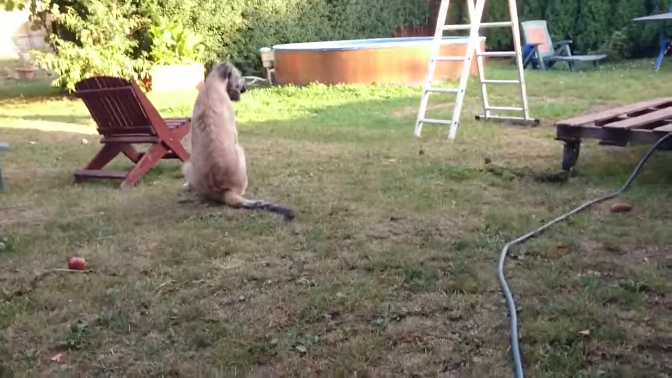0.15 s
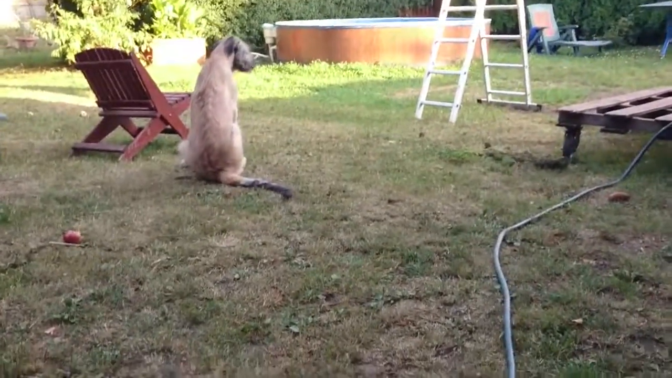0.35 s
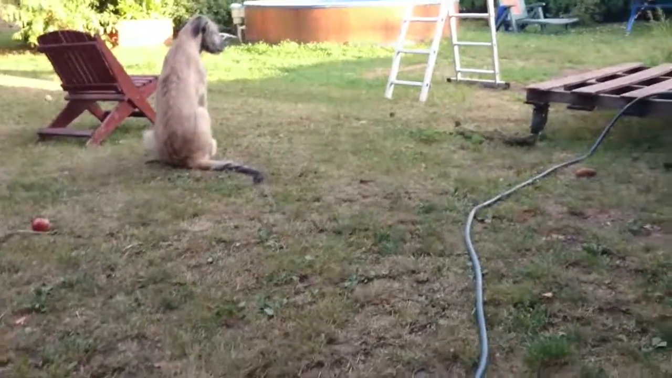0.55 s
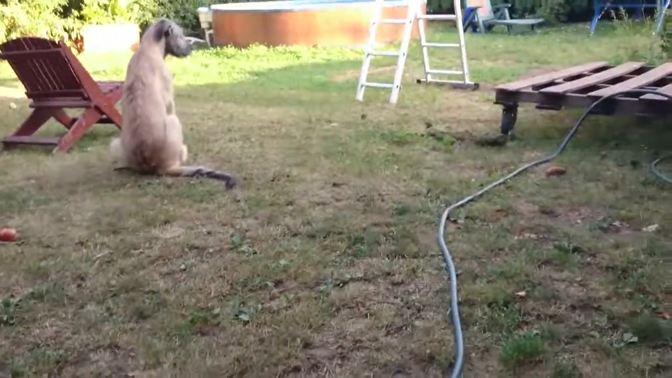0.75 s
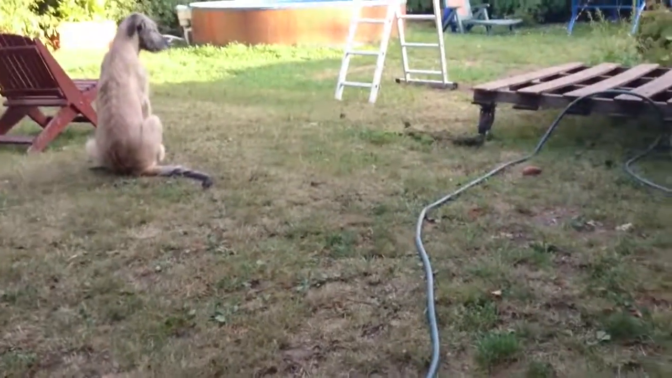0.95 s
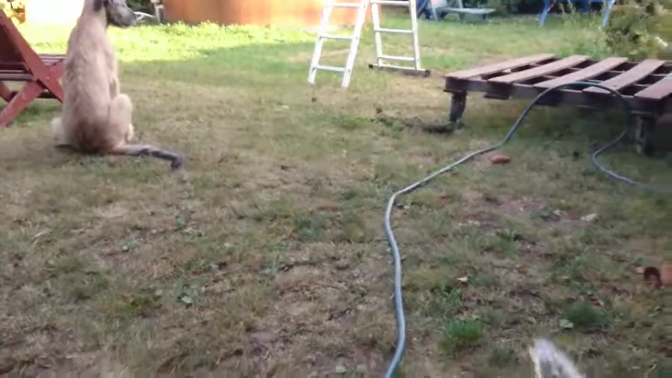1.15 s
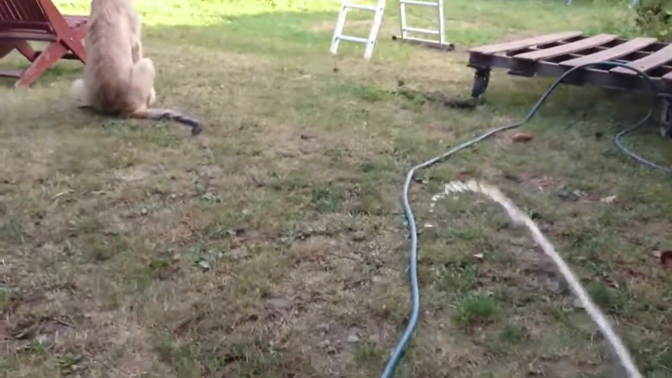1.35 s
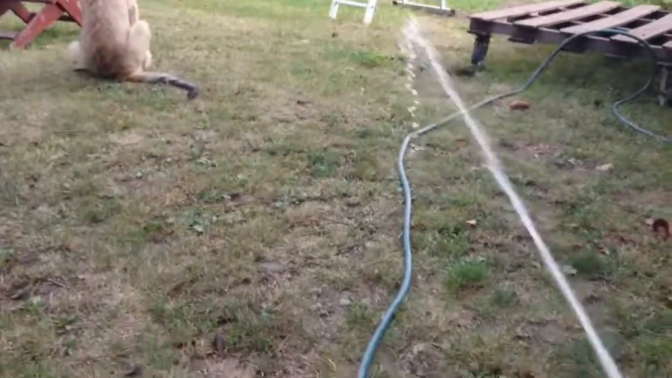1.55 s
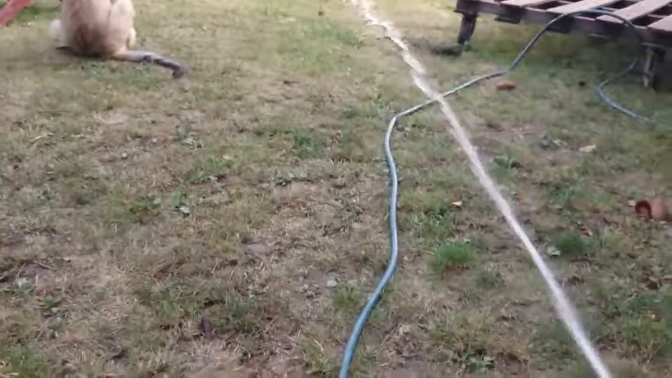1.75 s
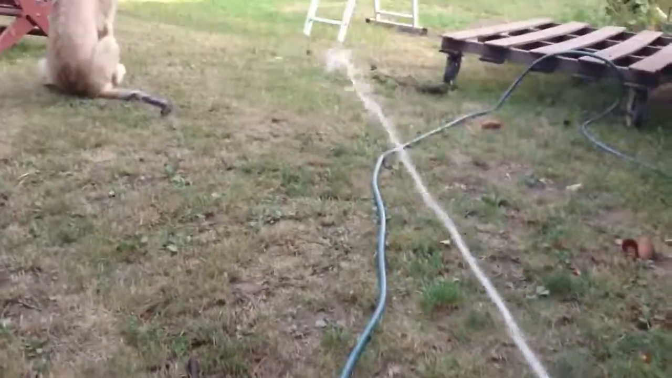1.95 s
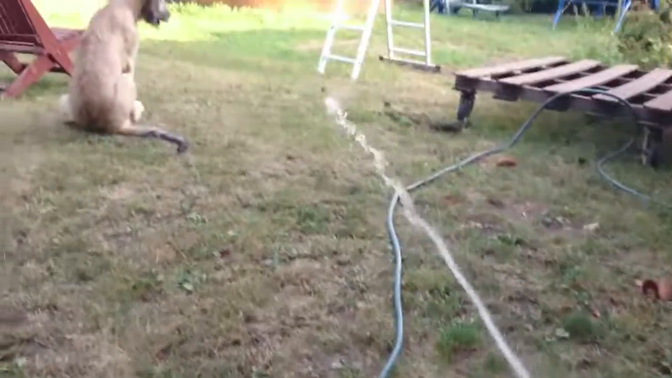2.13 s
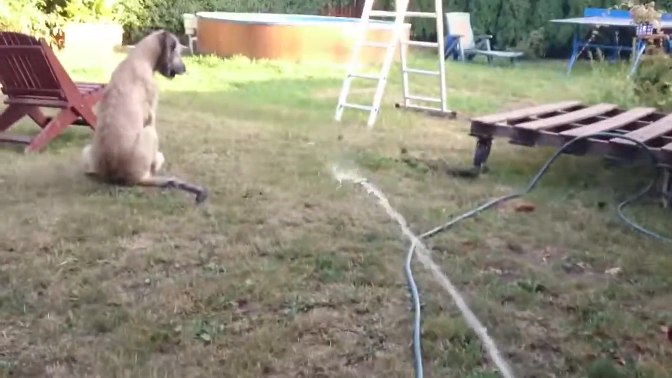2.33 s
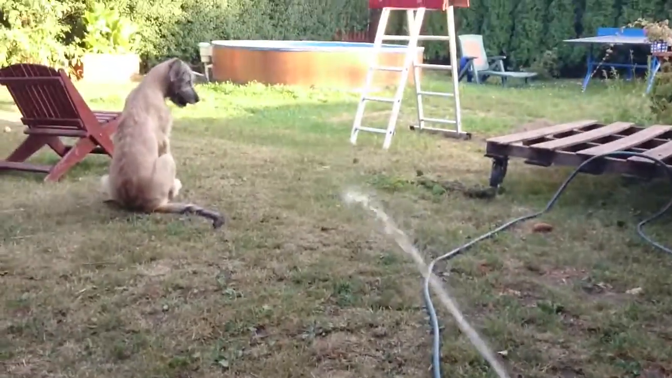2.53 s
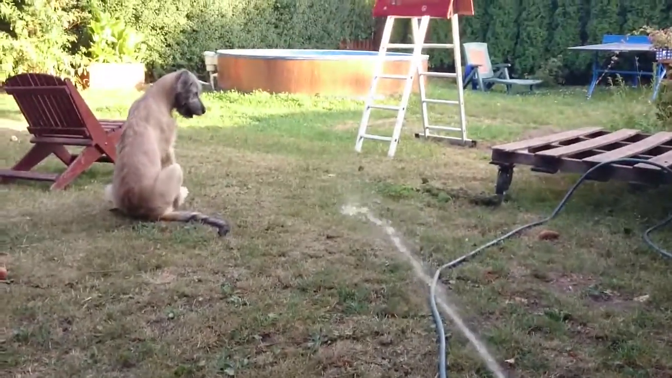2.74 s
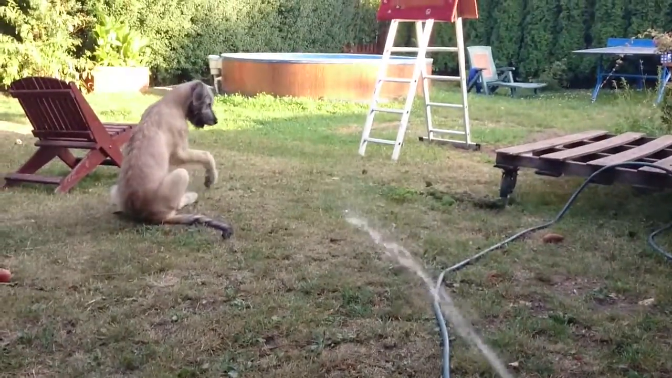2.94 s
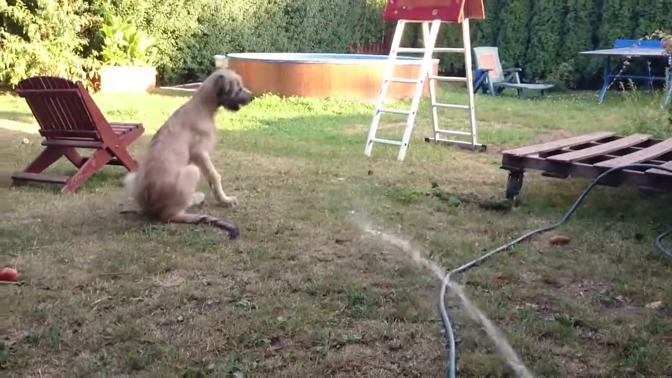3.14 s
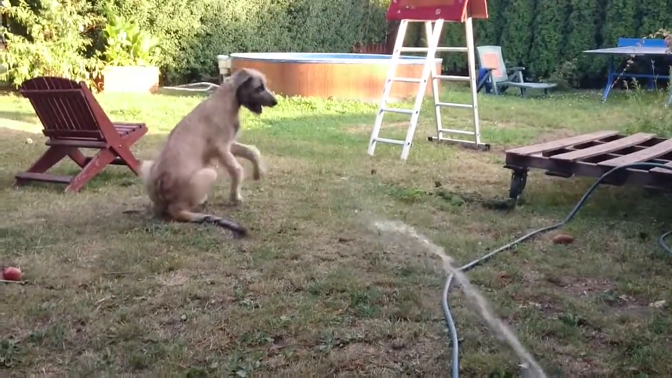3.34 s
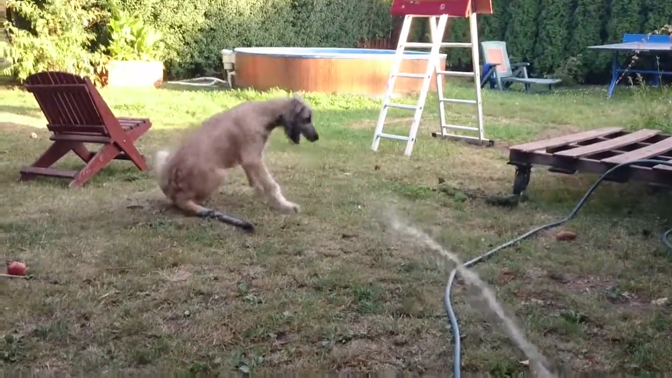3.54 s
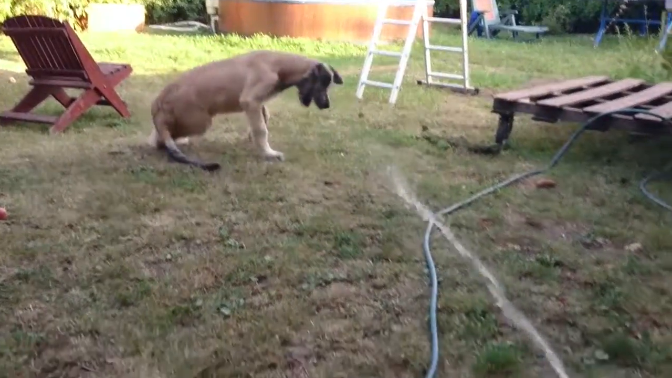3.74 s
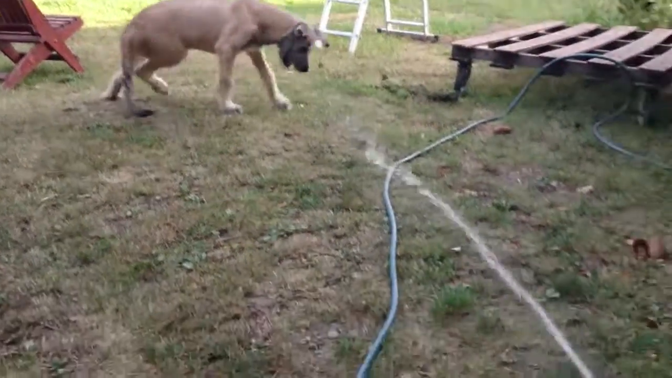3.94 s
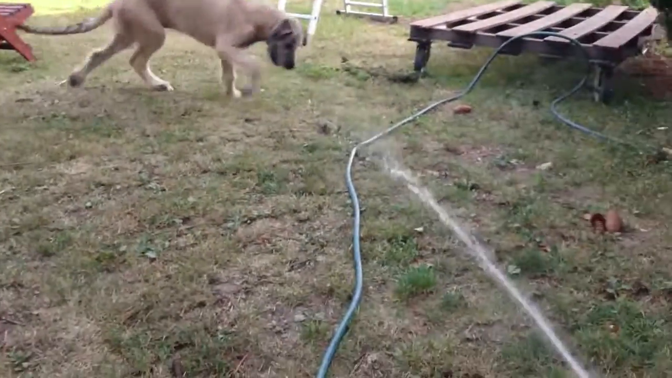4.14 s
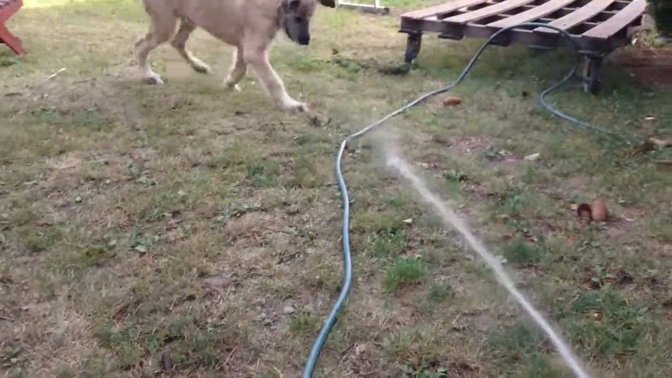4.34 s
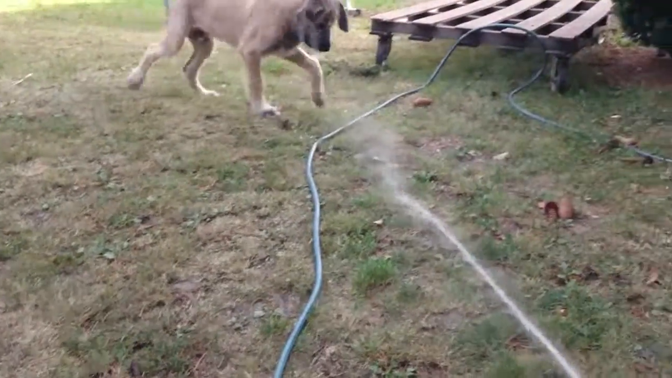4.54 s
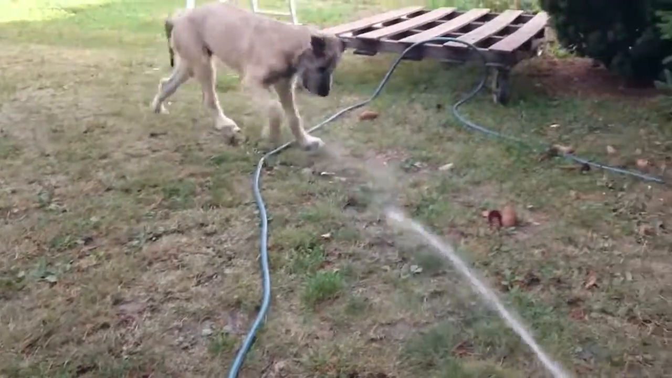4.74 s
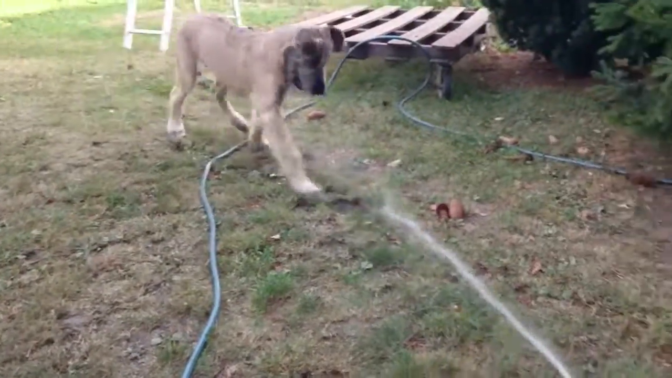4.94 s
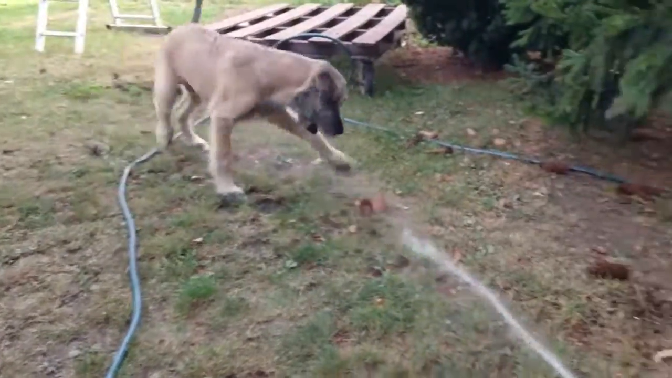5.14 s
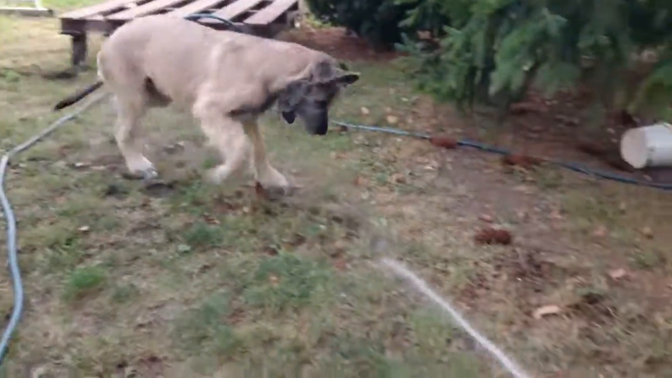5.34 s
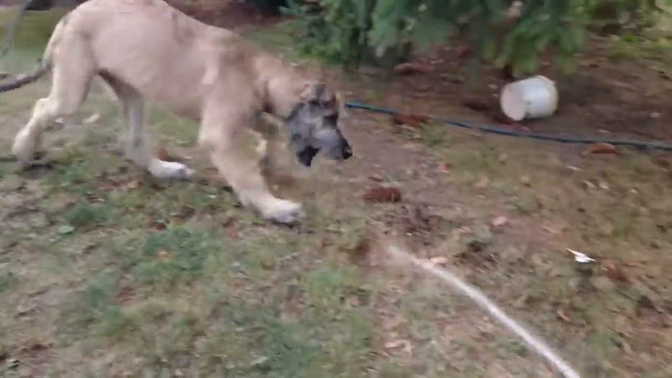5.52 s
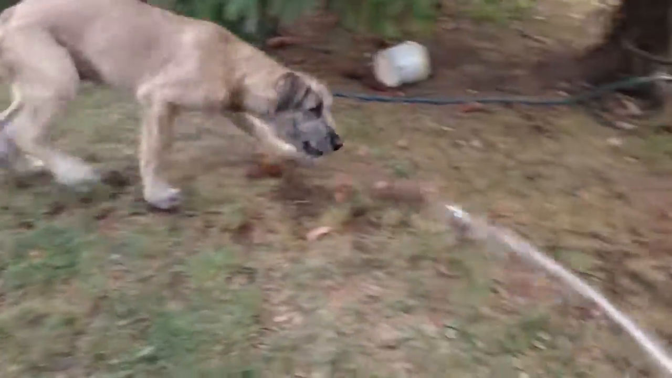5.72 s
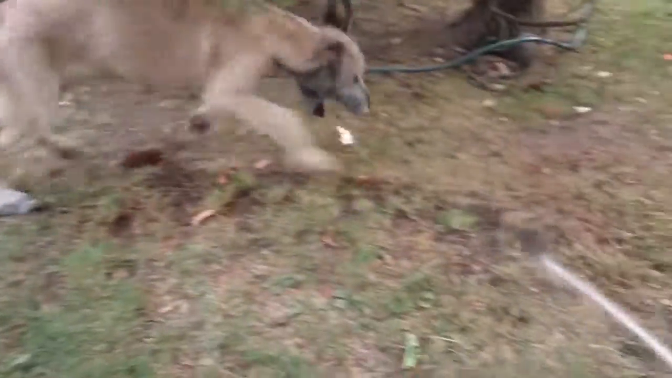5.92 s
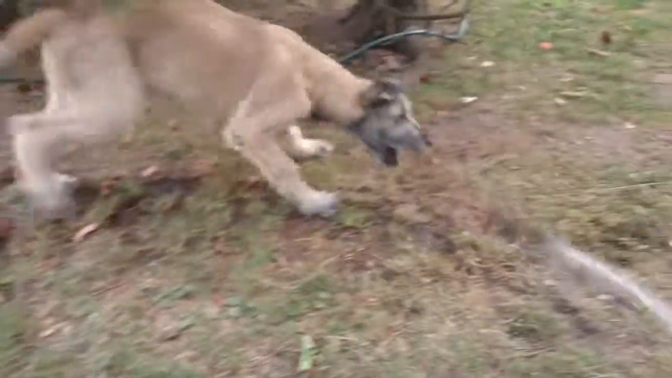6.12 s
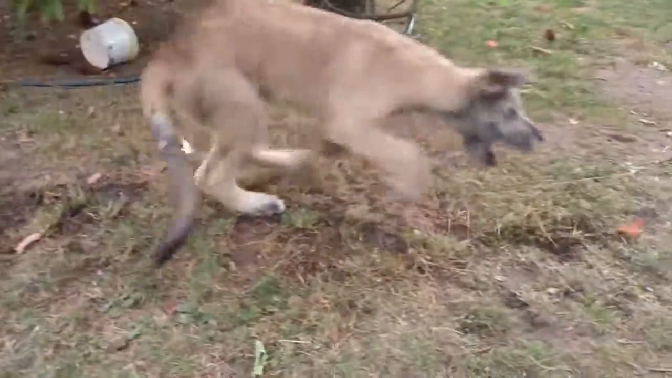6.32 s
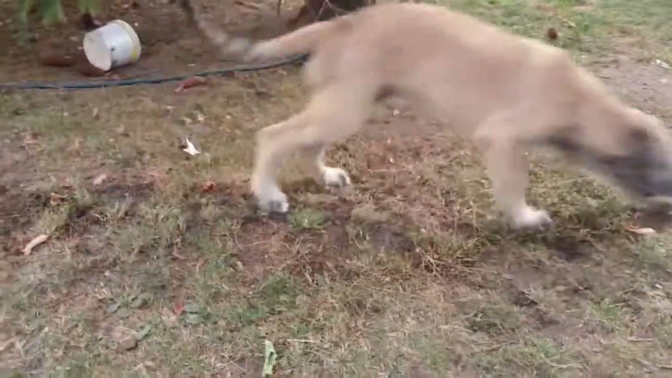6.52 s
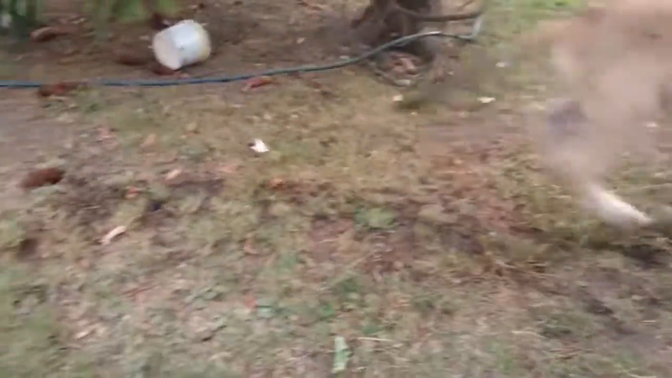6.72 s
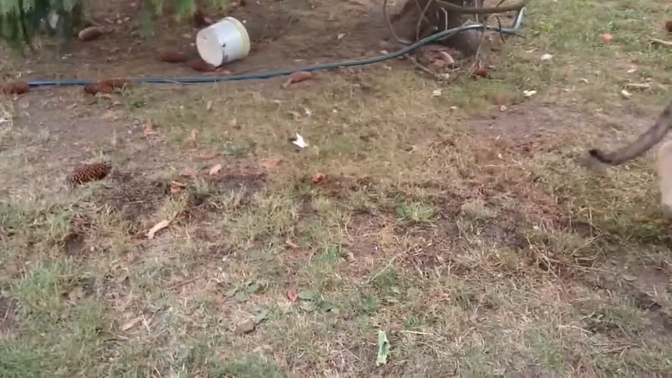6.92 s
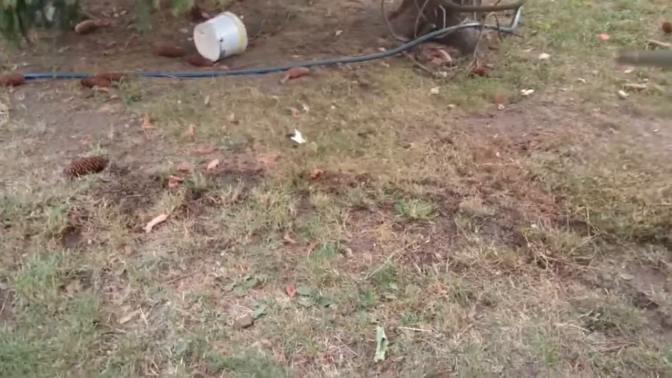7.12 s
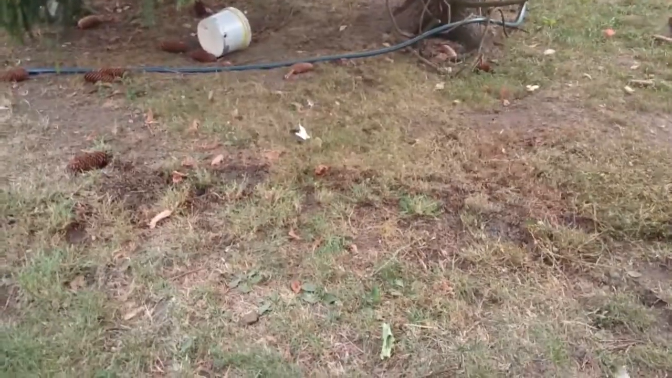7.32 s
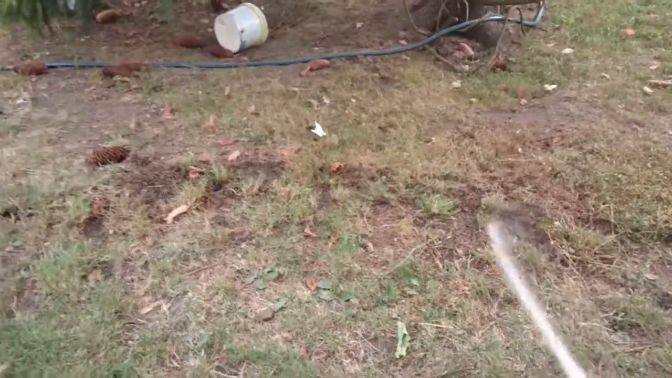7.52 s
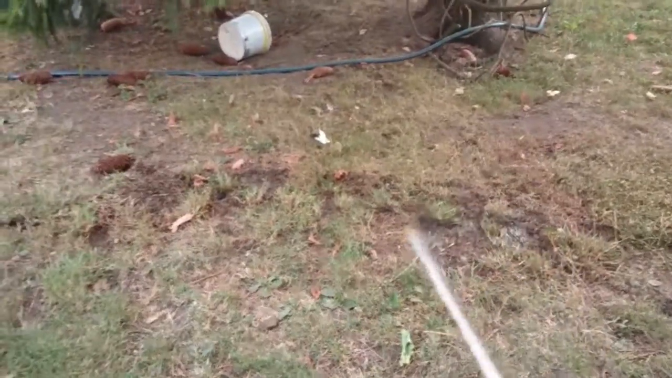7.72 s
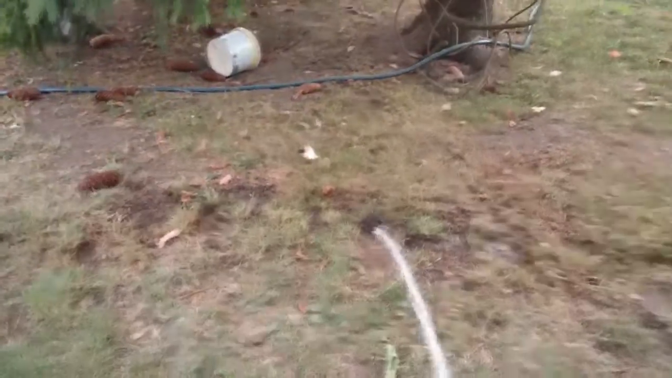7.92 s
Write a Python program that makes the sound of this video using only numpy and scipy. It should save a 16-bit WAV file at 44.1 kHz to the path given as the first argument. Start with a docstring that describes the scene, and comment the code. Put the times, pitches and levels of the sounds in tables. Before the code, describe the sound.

Quiet garden air, then a hose jet hisses hard onto dry grass, fizzing and spattering, stops abruptly, and bursts back closer and sharper.

```python
"""Faint hum, thin buzz and garden air come first, with light rustles; then a hose jet strikes a dry lawn.
Thousands of droplets a second hiss on the grass and patter on the soil, froth fizzes, and lumps of water slap.
A dog walks through the wet patch; the hose stops for a second, leaving the soaked ground, and starts again, nearer.
Clicks, filtered noise and ringing bubbles make the water, heard by a pair of ringing ports with widened bass."""
import sys
import numpy as np
from scipy import signal
from scipy.fft import rfft, irfft
from scipy.io import wavfile
from scipy.ndimage import uniform_filter1d

SR = 44100
rng = np.random.default_rng(int(sys.argv[2]) if len(sys.argv) > 2 else 0)


def wrap_up_sound(samples):
    """Save the sound to the file named by the first command line argument, as 16-bit audio."""
    columns = np.atleast_2d(samples).T
    # keep every value between -1 and 1, then stretch to whole-number steps
    tamed = np.clip(columns, -1, 1)
    steps = np.round(tamed * 32767).astype(np.int16)
    wavfile.write(sys.argv[1], SR, steps)


N = 351477
TIME = np.arange(N) / SR   # seconds

# Levels are set ahead of the microphone ports. Spectra are relative: only their shape counts.
# Spectrum of the garden air. Each row: frequency in Hz, density in dB.
GARDEN_SPECTRUM = [(25, -18), (45, -2), (80, 6), (115, 8.5), (170, -6), (350, -11), (700, -11),
                   (1400, -7.5), (2800, -10.5), (5600, -17), (10000, -13.5), (14000, -47)]
GARDEN_DB = -74
HUM_HZ, HUM_DB, BUZZ_HZ = 119, -87.5, 93.75   # the buzz has this pulse rate
# Thin electrical buzz: level of each multiple of its pulse rate, in dB, ahead of the curve below.
BUZZ_HARMONICS_DB = [-84.5, -90.5, -92, -93.5, -96, -100, -104, -106]
# The buzz fades after the first second. Each row: time in seconds, gain in dB.
BUZZ_FADE = [(1.15, -0.5), (1.4, -12)]
# Faint far-off tones. Each row: start in seconds, length in seconds, pitch in Hz, level in dB.
FAR_TONES = [(-.1, 0.28, 574, -81), (3.48, 0.68, 556, -82.5)]

# Rustles and splashy steps in the grass.
# Each row: centre in seconds, length in seconds, dull part in dB, bright part in dB.
RUSTLES = [(0.01, 0.56, -73, -74.5), (1.032, 0.61, -79, -75), (5.699, 0.053, -45.5, -39.5),
           (6.507, 0.037, -61.5, -53.5), (6.59, 0.062, -61, -79), (6.695, 0.055, -69, -63.5),
           (6.86, 0.046, -64, -57), (7, 0.053, -59.5, -62), (7.031, 0.031, -58, -57),
           (7.17, 0.054, -68, -65), (7.358, 0.031, -68, -67)]
RUSTLE_FIZZ_DB = -3.5   # wet grass fizzes with the bright part

# Where the water lands. Each row: time in seconds, lag of the left port in ms, share landing on the aim point.
AIM = [(0, 0.5, 0.05), (.9, 0.53, 0.21), (1.22, 0.51, 0.46), (1.8, 0.45, 0.83), (2.8, 0.44, 0.78),
       (4.05, .47, 0.55), (4.35, 0.45, 0.43), (5, 0.47, 0.53), (5.5, 0.4, .35), (6.35, 0.48, 0.32),
       (7.1, 0.61, 0.14), (7.46, 0.45, 0.77), (7.62, 0.42, 0.95), (7.77, 0.38, 0.92), (7.86, .345, 0.62),
       (7.97, 0.38, 0.52)]
AIM_BLUR_MS, SCATTER_MS = 0.01, .62   # spread of lags across the aim point; greatest lag of stray droplets
# Which way the splash lies. Each row: time in seconds, left over right in dB (before the ports).
BEARING = [(1.2, 0.5), (1.7, 1.5), (2.6, 1.5), (3.6, 0.4), (4.8, 2.5), (5.8, 2), (7.6, 1.5)]
# When the hose is open. Each row: opening in seconds, shutting in seconds.
SPRAYS = [(1.226, 6.405), (7.449, 8.1)]
OPEN_DB_PER_S, SHUT_DB_PER_S = 349, 230
# The jet on the lawn, a curve for each spray. Each row: time in seconds, hiss level in dB,
# patter on bare soil in dB over the hiss, fizz of froth in dB over the hiss.
FIRST_SWEEP = [(1.22, -49, -39, -1.5), (1.35, -47, -43, -21), (1.45, -41, -44, -31),
               (1.475, -42.5, -41, -3.5), (2.1, -42, -25.5, -4), (2.65, -40, -27.5, -8.5),
               (3.1, -41, -20.5, -6.5), (3.95, -41, -22, -9.5), (4.2, -43, -16, -7), (4.35, -42.5, -17, -1),
               (4.65, -41.5, -15.5, -4), (5.15, -42.5, -12.5, 1.5), (5.27, -43, -12.5, 0),
               (5.8, -43.5, -8, 0.5), (6.35, -43.5, -8.5, -6)]
SECOND_SWEEP = [(7.45, -45, -22, -4.5), (7.555, -49, -8.5, 1), (7.595, -38, -36, -3.5),
                (7.76, -39, -25, -1.5), (7.85, -43, -12, -3), (7.97, -40, -18.5, -4.5)]
# Brief swells of the splash. Each row: centre in seconds, length in seconds, hiss gain in dB, mist gain in dB.
SURGES = [(5.483, 0.27, 5, 6), (5.605, 0.053, 3, 8.5), (5.843, 0.047, 4, -10), (5.952, 0.086, 6.5, 8),
          (6.044, 0.25, 6.5, 6), (6.243, 0.24, 3, 5), (6.407, 0.074, 3.5, 11)]
PATTER_FOLLOWS, FIZZ_FOLLOWS = 0.11, 0.87   # dB for each dB of a surge in the hiss
FIZZ_VALVE_POWER = 2.9   # froth builds only under the full flow
DROP_SPREAD_DB, SPREAD_PER_FOCUS_DB = -0.9, 4   # uneven drop sizes; a tighter jet throws bigger ones
# Spectra of patter on soil, hiss on grass and fine mist. Each row: frequency in Hz, density in dB.
PATTER_SPECTRUM = [(45, -15), (150, -28), (280, -14.5), (600, -10), (1000, -3.5), (1400, 4), (2100, 5),
                   (3000, 2.5), (6000, -15)]
HISS_SPECTRUM = [(150, -60), (500, -58.5), (1000, -20), (1450, -14.5), (1900, -5.5), (2400, -10.5),
                 (3000, -4.5), (4800, -2.5), (6000, -3), (8000, -3), (11000, 4), (13000, -1.5),
                 (16000, -9.5)]
MIST_SPECTRUM = [(2000, -45.5), (6500, -8.5), (11000, -23), (13000, -6), (14500, -13), (15700, -5.5),
                 (16500, -32)]
MIST_DB, MIST_PER_FINE_DB = -11, 1.21   # mist over the hiss: the finer the froth, the more mist
# Bright bursts of fine spray: puffs at the nozzle's opening and from wet grass, and one sharp crack
# in the second spray. Each row: centre in seconds, length in seconds, level in dB.
BRIGHT_BURSTS = [(1.285, 0.12, -46.5), (6.86, 0.037, -60), (7.45, .07, -65), (7.823, 0.002, -28.5)]
# The two pitches of the froth. Each row: time in seconds, coarse bubbles in Hz, fine bubbles in Hz,
# fine over coarse in dB.
FROTH = [(.2, 5370, 6860, -0.5), (.9, 5470, 6150, 4), (1.22, 4260, 6100, -7), (1.48, 4440, 6050, -13),
         (1.8, 4890, 5580, -8), (2.8, 4800, 5850, -5.5), (4.05, 4740, 6000, -3.5), (4.35, 5650, 6620, 3.5),
         (5, 5570, 6720, 5), (5.5, 6020, 6600, 8), (6.35, 5320, 6400, 2.5), (7.1, 5300, 5970, 1),
         (7.46, 4650, 5500, -5), (7.6, 5420, 6200, 2.5), (7.97, 5200, 6750, 9.5)]
FROTH_WANDER = 0.077   # quick pitch wander in octaves, for a fully scattered jet
# Fat drops cracking on leaves. Each row: time in seconds, level in dB over the hiss.
CRACKLE = [(1.2, -11), (3.8, -15.5), (4.3, -15), (5.4, -12), (6, -7), (6.6, -9), (7.55, -14), (7.62, 0.5),
           (7.8, 2.5), (7.9, -5)]
# Spectrum of those cracks. Each row: frequency in Hz, density in dB.
CRACK_SPECTRUM = [(1000, -34.5), (3800, -22), (5500, -5), (8000, 6), (11500, 6), (13500, -11), (16000, -21)]
CRACKLE_PER_S, CRACKLE_SPREAD_DB = 650, 3.5
# Biggest lumps of water slapping the ground, from the jet or thrown up in wet grass.
# Each row: time in seconds, strength in dB (all slaps are later turned down together).
SLAPS = [(1.2145, -29), (1.3215, -26), (1.503, -28), (1.652, -19), (1.7582, -23), (2.093, -21),
         (2.7045, -22), (3.0817, -20), (3.847, -23), (4.3278, -17), (4.7735, -24), (4.9364, -21),
         (5.483, -14), (5.737, -13.5), (5.8289, -14), (5.9521, -13), (5.9567, -23), (5.967, -17),
         (5.9826, -17), (6.0235, -23), (6.053, -16), (6.127, -25), (7.025, -44), (7.041, -41),
         (7.3415, -38), (7.4562, -28), (7.5879, -20), (7.6353, -24), (7.68, -17), (7.693, -17),
         (7.7445, -21), (7.751, -17), (7.7685, -17), (7.779, -14), (7.9615, -16)]
SMALL_SLAPS_PER_S, SMALL_SLAP_DB, SMALL_SLAP_SPREAD_DB = 3.9, 16, 8   # strength is over the hiss

# Hollow gurgles in the puddle. Each row: start in seconds, length in seconds, first pitch in Hz,
# last pitch in Hz, level in dB before the churning.
GURGLES = [(5.671, 0.026, 1284, 1050, -54), (5.691, 0.044, 975, 940, -59.5),
           (5.706, 0.0082, 1250, 1254, -54), (6.502, 0.02, 1620, 1680, -71), (6.565, 0.06, 1185, 1413, -67),
           (6.58, 0.05, 1557, 1900, -69), (6.586, 0.049, 780, 790, -74), (6.981, 0.066, 830, 860, -78),
           (6.995, 0.028, 1100, 1160, -73), (7.019, 0.016, 1520, 1620, -68), (7.335, 0.08, 1152, 1096, -73)]
PUDDLE_LAG_MS = 0.14   # the puddle lies more nearly straight ahead than the splash
# The dog's paws on the turf. Each row: time in seconds, strength in dB (later turned down together).
PAWS = [(5.685, -50), (5.715, -59), (6.19, -49.5), (6.26, -60), (6.32, -59)]
# Spectrum of a paw's thud. Each row: frequency in Hz, density in dB.
THUD_SPECTRUM = [(25, -18), (80, 3), (160, -1), (300, -15), (600, -20), (2000, -40)]
# The soaked ground once the hose is shut: levels, how long they hold and how fast they drain away.
SOAK_PATTER_DB, SOAK_HISS_DB, SOAK_FIZZ_DB = -68.5, -66.5, -68
SOAK_HOLD_S, SOAK_DB_PER_S, FIZZ_DRAIN_DB_PER_S = 0.63, 22, 66
# Small dull taps while the water is off. Each row: time in seconds, strength in dB, ring in Hz.
TAPS = [(6.775, -39.5, 1760), (6.902, -43, 2260), (7.158, -46, 2020)]
# Spectrum of a tap's knock. Each row: frequency in Hz, density in dB.
TAP_SPECTRUM = [(200, -18), (550, -11), (800, -8), (1350, 1), (1700, 4), (2050, 1), (2500, -12),
                (6000, -8.5), (14000, -26)]
TAP_RING_DB, TAP_RING_S = -12, .003   # ring over the tap's strength; its decay

# Colour of the two microphone ports. Each row: frequency in Hz, gain in dB.
LEFT_PORT = [(100, -2), (1000, 5.5), (1400, 4.5), (1900, 3), (2450, 4.5), (2900, 0), (3600, 5.5), (4400, 4),
             (4950, 8.5), (5600, 3.5), (6150, -1), (7000, -0.5), (8200, -1.5), (9500, 1), (11000, -11),
             (12200, -5.5), (14000, -3.5), (15400, 10.5)]
RIGHT_PORT = [(100, 0.5), (1000, 5.5), (1500, 4.5), (2000, 4), (2400, 4.5), (2950, 7), (3400, 6.5),
              (3950, 7.5), (4450, 2.5), (4850, -1), (5400, 7.5), (6100, 10.5), (6800, 4), (7400, 8.5),
              (9000, -0.5), (10700, -0.5), (12700, -5), (14000, 5.5), (15400, 3)]
# Gain of the difference between the ports, largest in the bass. Each row: frequency in Hz, gain in dB.
WIDENING = [(100, 13.6), (500, 11.5), (750, 7.9), (1100, 0.5), (2000, 1.2), (4000, 0.24), (16000, 1.1)]
CUTOFF_HZ = 15800


def from_db(db):
    """Decibels to gain."""
    return np.exp(np.asarray(db) * (np.log(10) / 20))


def together_db(*levels_db):
    """The level of unrelated sounds heard at once: their powers add."""
    return 10 * np.log10(sum(from_db(db) ** 2 for db in levels_db) + 1e-20)


def rms_one(x):
    """Scale to rms 1."""
    return x / np.sqrt(np.mean(x ** 2) + 1e-20)


def in_time(rows):
    """The columns of a curve at every sample."""
    s, *columns = np.transpose(rows)
    return [np.interp(TIME, s, column) for column in columns]


def drift(rate_hz):
    """Random wandering of rms 1: noise smoothed above the rate by two equal poles."""
    pole = np.exp(-2 * np.pi * rate_hz / SR)
    noise = rng.standard_normal(N + SR)   # the first second lets the filter settle
    return rms_one(signal.lfilter([1], [1, -2 * pole, pole * pole], noise)[-N:])


def swell(s, length):
    """A smooth rise and fall around s, 1 on top."""
    return np.cos(np.pi * np.clip((TIME - s) / length, -.5, .5)) ** 2


def bell_db(s, length):
    """A rounded burst around s in dB, 0 on top; length is its width at half the height."""
    return 20 * np.log10(.5) * np.minimum((2 * (TIME - s) / length) ** 2, 20)


def response(spectrum, size=4096):
    """The causal (minimum-phase) impulse response that has this spectrum, by folding its cepstrum."""
    hz, db = np.transpose(spectrum)
    grid_hz = np.maximum(np.fft.rfftfreq(size, 1 / SR), 1)
    grid_db = np.interp(np.log(grid_hz), np.log(hz), db)
    cepstrum = irfft(np.log(from_db(grid_db)))
    cepstrum[1:size // 2] *= 2
    cepstrum[size // 2 + 1:] = 0
    return irfft(np.exp(rfft(cepstrum)))


def through(x, impulse):
    """Filter each channel."""
    return signal.oaconvolve(np.atleast_2d(x), impulse[None], axes=1)[:, :N]


def coloured(white, spectrum):
    """Give a white signal a spectrum; rms 1."""
    return rms_one(through(white, response(spectrum)))


def at_ports(at, sizes, lag_ms):
    """Clicks at the two ports, the left one later by the lag (earlier if it is negative)."""
    left_at = at + np.round(lag_ms * SR / 1000).astype(int)
    return np.array([np.bincount(np.clip(i, 0, N - 1), sizes, N) for i in (left_at, at)])


def garden():
    """Diffuse outdoor air, a low hum, a thin buzz of even pulses and two faint, wavering far tones."""
    air = from_db(GARDEN_DB) * coloured(rng.standard_normal((2, N)), GARDEN_SPECTRUM)
    hum = from_db(HUM_DB) * np.sin(2 * np.pi * HUM_HZ * TIME)
    buzz = sum(from_db(db) * np.cos(2 * np.pi * multiple * BUZZ_HZ * TIME)
               for multiple, db in enumerate(BUZZ_HARMONICS_DB, start=1))
    tones = hum + from_db(in_time(BUZZ_FADE)[0]) * buzz
    waver_rad, fading_db = 1.3 * drift(rate_hz=9), 1.7 * drift(rate_hz=10)
    for s, length, hz, db in FAR_TONES:
        envelope = np.sin(np.pi * np.clip((TIME - s) / length, 0, 1))
        tones = tones + from_db(db + fading_db) * envelope * np.sin(2 * np.pi * hz * TIME + waver_rad)
    return air + np.sqrt(2) * tones   # a sine of peak sqrt(2) has rms 1


def rustle_levels():
    """Dull and bright levels in dB of grass brushed or stepped on, as rounded bursts of many impacts."""
    dull_db = together_db(*(db + bell_db(s, length) for s, length, db, _ in RUSTLES))
    bright_db = together_db(*(db + bell_db(s, length) for s, length, _, db in RUSTLES))
    return dull_db, bright_db


def jet_levels():
    """Patter, hiss, fizz and mist of the jet in dB: the sweep, gated by the valve, with its surges."""
    level_db, soil_db, foam_db = in_time(FIRST_SWEEP + SECOND_SWEEP)
    ramps_db = [np.minimum(OPEN_DB_PER_S * (TIME - opens), SHUT_DB_PER_S * (shuts - TIME))
                for opens, shuts in SPRAYS]
    valve_db = np.minimum(np.max(ramps_db, axis=0), 0)
    surge_db = sum(db * swell(s, length) for s, length, db, _ in SURGES)
    gust_db = sum(db * swell(s, length) for s, length, _, db in SURGES)
    fine_db = MIST_DB + MIST_PER_FINE_DB * in_time(FROTH)[-1]
    bursts_db = [db + bell_db(s, length) for s, length, db in BRIGHT_BURSTS]
    return (level_db + valve_db + soil_db + PATTER_FOLLOWS * surge_db,
            level_db + valve_db + surge_db,
            level_db + FIZZ_VALVE_POWER * valve_db + foam_db + FIZZ_FOLLOWS * surge_db,
            together_db(level_db + valve_db + fine_db + gust_db, *bursts_db))


def soaked_levels():
    """Patter, hiss and fizz in dB of the wet ground after the first spray: they hold, then drain away."""
    shut_s = SPRAYS[0][1]
    after_db = np.where(TIME > shut_s, 0, -np.inf)   # silent until the hose shuts
    draining_s = np.maximum(TIME - shut_s - SOAK_HOLD_S, 0)
    trickle_db = after_db - SOAK_DB_PER_S * draining_s
    foam_db = after_db - FIZZ_DRAIN_DB_PER_S * draining_s
    return SOAK_PATTER_DB + trickle_db, SOAK_HISS_DB + trickle_db, SOAK_FIZZ_DB + foam_db


def water_levels():
    """Levels of patter, hiss, fizz and mist: the powers of jet, soaked ground and rustles add."""
    dull_db, bright_db = rustle_levels()
    patter_db, hiss_db, fizz_db, mist_db = jet_levels()
    soak_patter_db, soak_hiss_db, soak_fizz_db = soaked_levels()
    return (together_db(patter_db, soak_patter_db, dull_db),
            together_db(hiss_db, soak_hiss_db, bright_db),
            together_db(fizz_db, soak_fizz_db, bright_db + RUSTLE_FIZZ_DB),
            mist_db)


def droplets(per_s, spread_db, lag_ms, direct):
    """Random impacts of uneven size: some close to the aim point, the rest splashed all around it."""
    at = np.flatnonzero(rng.random(N) < per_s / SR)
    size, sign, place, scatter = rng.random((N, 4))[at].T
    sizes = from_db(spread_db[at] * np.minimum(-np.log(1 - size), 5)) * np.sign(sign - .5)
    sizes /= np.sqrt(uniform_filter1d(sizes ** 2, size=601))   # even out the level over many drops
    aimed_ms = lag_ms[at] + AIM_BLUR_MS * rng.standard_normal(N)[at]
    stray_ms = SCATTER_MS * (2 * scatter - 1)
    return at_ports(at, sizes, np.where(place < direct[at], aimed_ms, stray_ms))


def bubbles(clicks, centre_hz, width_hz):
    """Tiny bubbles ring for a few cycles around a moving pitch; rms 1."""
    carrier = np.exp(2j * np.pi * np.cumsum(centre_hz) / SR)
    lowpass = signal.butter(2, width_hz / 2, fs=SR, output="sos")
    # shift the pitch down to zero, smooth there, and shift back
    ringing = signal.sosfilt(lowpass, clicks * carrier.conj() + 1e-18)
    return rms_one(np.real(ringing * carrier))


def froth(clicks, direct):
    """Coarse and fine bubbles; their pitches move over time and wander more as the jet scatters."""
    coarse_hz, fine_hz, fine_db = in_time(FROTH)
    wander = 2 ** (FROTH_WANDER * (1 - direct) * drift(rate_hz=37))
    coarse = bubbles(clicks, coarse_hz * wander, width_hz=650)
    fine = bubbles(clicks, fine_hz * wander, width_hz=560)
    return (coarse + from_db(fine_db) * fine) / np.sqrt(1 + from_db(fine_db) ** 2)


def jet(levels_db, lag_ms, direct):
    """The jet breaks into lumps, so patter, hiss, fizz and mist flutter together."""
    patter_db, hiss_db, fizz_db, mist_db = levels_db
    spread_db = DROP_SPREAD_DB + SPREAD_PER_FOCUS_DB * direct

    def drops(per_s):
        """Fresh droplets of this jet."""
        return droplets(per_s, spread_db, lag_ms, direct)

    flutter_db = 0.45 * drift(rate_hz=230) + 0.57 * drift(rate_hz=18.0)
    fizz_flutter_db = flutter_db + 1.6 * drift(rate_hz=200)
    mist_flutter_db = flutter_db + 2.4 * drift(rate_hz=3.2)
    patter = coloured(drops(3500), PATTER_SPECTRUM) * from_db(patter_db + 0.84 * flutter_db)
    hiss = coloured(drops(15000), HISS_SPECTRUM) * from_db(hiss_db + flutter_db)
    fizz = froth(drops(5000), direct) * from_db(fizz_db + fizz_flutter_db)
    mist = coloured(drops(12000), MIST_SPECTRUM) * from_db(mist_db + mist_flutter_db)
    return patter + hiss + fizz + mist


def crackle(hiss_db, lag_ms):
    """Single fat drops crack on leaves and stand out of the hiss when the jet lands near."""
    at = np.flatnonzero(rng.random(N) < CRACKLE_PER_S / SR)
    size, sign, scatter = rng.random((N, 3))[at].T
    sizes = from_db(CRACKLE_SPREAD_DB * np.minimum(-np.log(1 - size), 3)) * np.sign(sign - .5)
    clicks = at_ports(at, sizes, lag_ms[at] + SCATTER_MS * (scatter - .5))
    return coloured(clicks, CRACK_SPECTRUM) * from_db(hiss_db + in_time(CRACKLE)[0])


def hits(rows, spectrum, lag_ms, decay_s, spatter):
    """Each hit is a click with a short decaying burst of spatter, coloured by what it strikes."""
    s, db = np.transpose(rows)
    at = np.round(s * SR).astype(int)
    clicks = at_ports(at, from_db(db), lag_ms[at])
    decay = signal.lfilter([1], [1, -np.exp(-1 / (decay_s * SR))], clicks + 1e-18)
    burst = decay * rng.standard_normal((2, N))
    impulse = response(spectrum)
    return through(clicks + spatter * burst, impulse / np.abs(impulse).max())


def small_slaps(hiss_db):
    """Lesser lumps land at random, as strong as the hiss is: rows of seconds and strength in dB."""
    at = np.flatnonzero(rng.random(N) < SMALL_SLAPS_PER_S / SR)
    uneven_db = SMALL_SLAP_SPREAD_DB * np.minimum(rng.standard_normal(N)[at], 2)
    return np.transpose([TIME[at], hiss_db[at] + SMALL_SLAP_DB + uneven_db])


def slaps(hiss_db, lag_ms):
    """Lumps of water, big and small, slap the ground with a click and a quick spatter."""
    lumps = np.vstack([SLAPS, small_slaps(hiss_db)])
    return from_db(-6.0) * hits(lumps, HISS_SPECTRUM, lag_ms, decay_s=0.0023, spatter=0.17)


def gurgles(width_hz, lag_ms):
    """Churned water rings an air pocket whose pitch slides as it changes size."""
    out = np.zeros(N)
    churn = 1.6 + 0.97 * (drift(width_hz) + 1j * drift(width_hz))   # unsteady in level and phase
    for s, length, first_hz, last_hz, db in GURGLES:
        age = np.clip((TIME - s) / length, 0, 1)
        phase = 2 * np.pi * np.cumsum(first_hz + (last_hz - first_hz) * age) / SR
        envelope = np.interp(age, [0, .08, .7, 1], [0.0036, 1, 1.0, 0.011])
        out += from_db(db) * envelope * np.real(churn * np.exp(1j * phase))
    left = np.interp(TIME - lag_ms / 1000, TIME, out)
    return np.array([left, out])


def paws(lag_ms):
    """The dog's paws land on the turf as soft low thuds with a slow decay."""
    return from_db(-17.0) * hits(PAWS, THUD_SPECTRUM, lag_ms, decay_s=0.042, spatter=0.18)


def taps(lag_ms):
    """Each tap is a dull knock that rings a small hollow at a pitch of its own."""
    rows = [(s, db) for s, db, _ in TAPS]
    out = from_db(-3.5) * hits(rows, TAP_SPECTRUM, lag_ms, decay_s=0.0026, spatter=0.21)
    port_lags_s = np.array([lag_ms, 0 * lag_ms]) / 1000
    for s, db, hz in TAPS:
        age = np.maximum(TIME - s - port_lags_s, 0)
        ring = np.exp(-age / TAP_RING_S) * np.sin(2 * np.pi * hz * age)
        out = out + from_db(db + TAP_RING_DB) * ring
    return out


def scene():
    """Everything as it arrives at the two ports."""
    lag_ms, direct = in_time(AIM)
    puddle_lag_ms = np.full(N, PUDDLE_LAG_MS)
    bearing_db, = in_time(BEARING)
    levels_db = water_levels()
    hiss_db = levels_db[1]
    water = jet(levels_db, lag_ms, direct) + crackle(hiss_db, lag_ms) + slaps(hiss_db, lag_ms)
    water = water + gurgles(width_hz=110, lag_ms=puddle_lag_ms)
    placed = water * from_db([bearing_db / 2, -bearing_db / 2])
    return garden() + placed + paws(lag_ms) + taps(puddle_lag_ms)


def port(x, colour, size=512):
    """Colour one channel without delaying it, so that the lag between the ports still hollows their sum."""
    zero_phase = irfft(np.abs(rfft(response(colour, size=size))))
    impulse = np.roll(zero_phase, size // 2)
    return signal.oaconvolve(x, impulse)[size // 2:size // 2 + N]


def record(dry):
    """The difference of the ports is boosted, each port adds its own ring, and the top is cut."""
    mid = (dry[0] + dry[1]) / 2
    side = through((dry[0] - dry[1]) / 2, response(WIDENING))[0]
    ports = np.array([port(mid + side, LEFT_PORT), port(mid - side, RIGHT_PORT)])
    top_cut = signal.ellip(12, .1, 80, CUTOFF_HZ, fs=SR, output="sos")   # .1 dB ripple, 80 dB down
    return signal.sosfilt(top_cut, ports)


dry = scene()
out = record(dry)
wrap_up_sound(out)
```